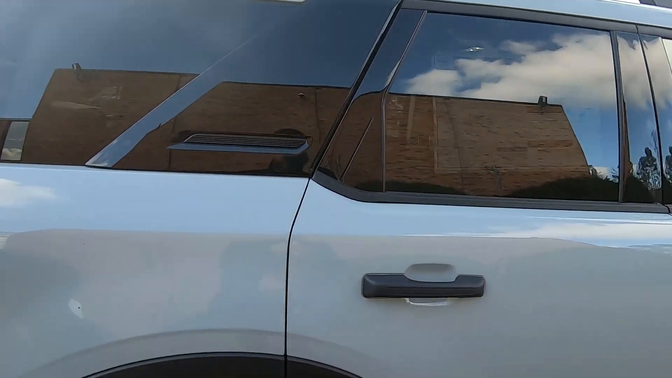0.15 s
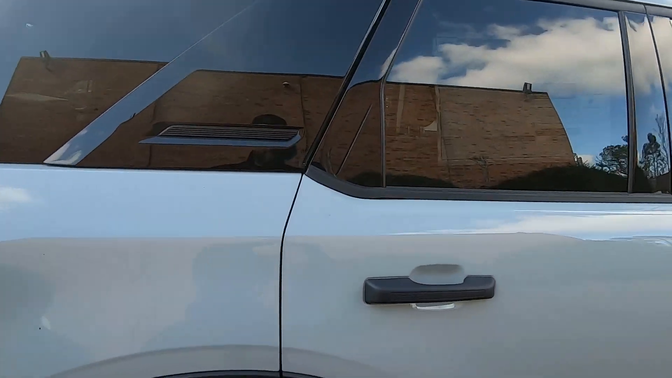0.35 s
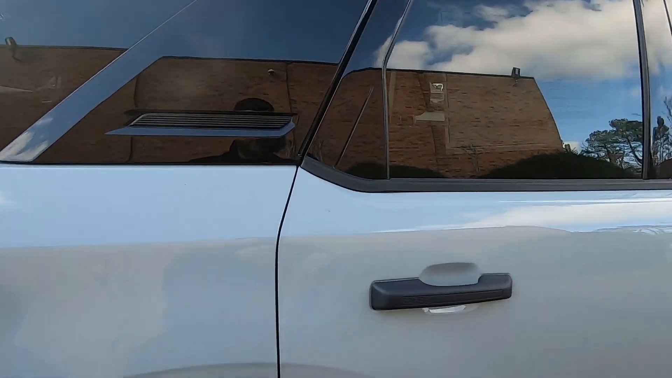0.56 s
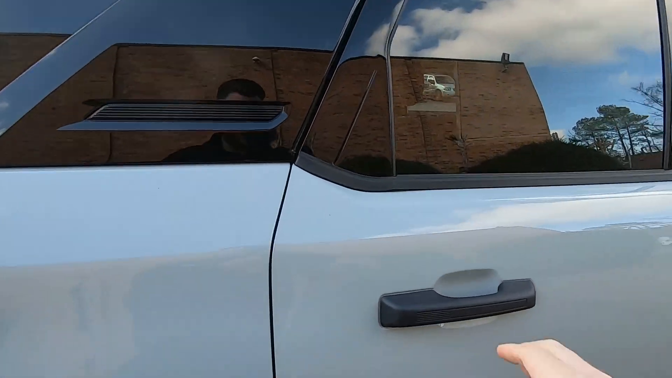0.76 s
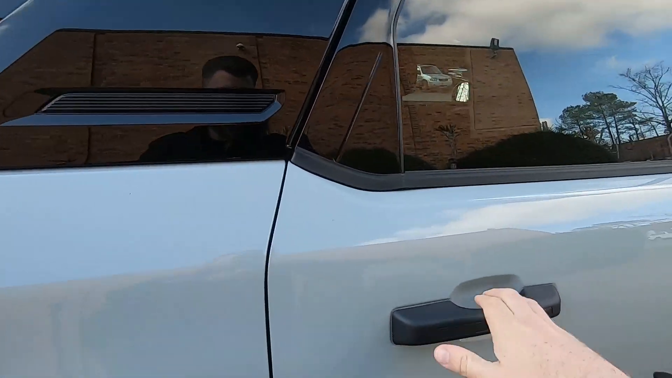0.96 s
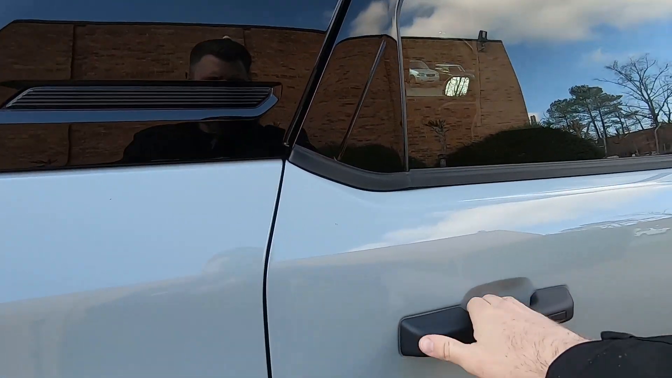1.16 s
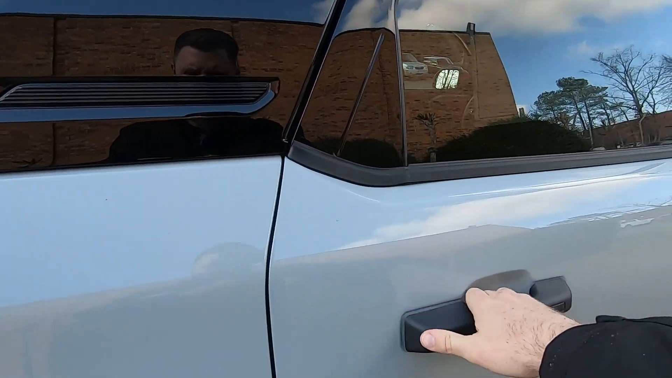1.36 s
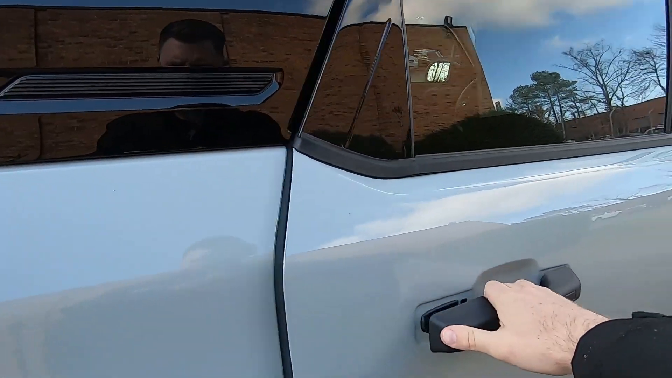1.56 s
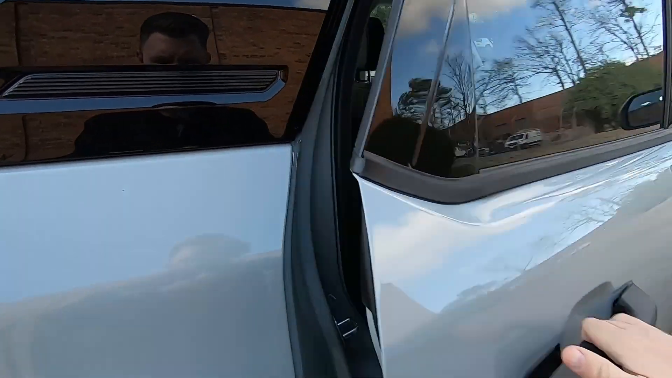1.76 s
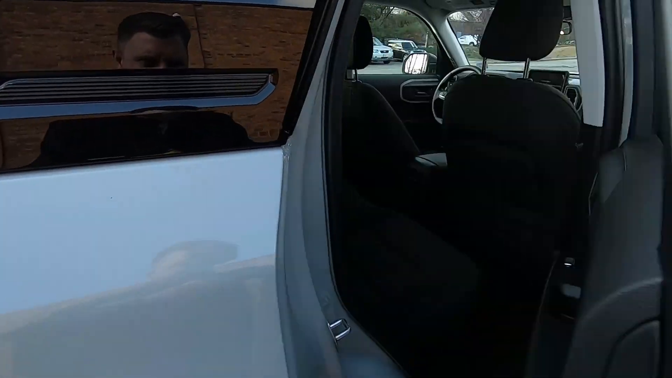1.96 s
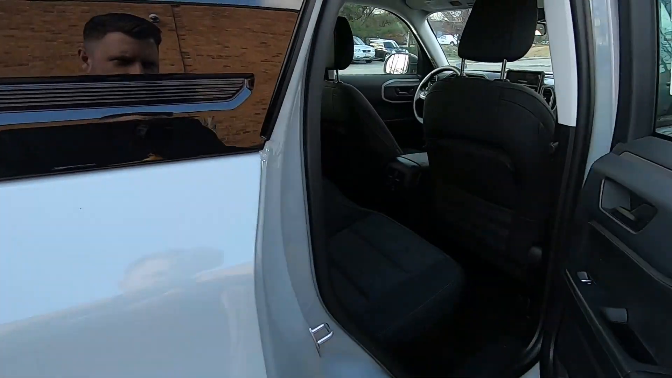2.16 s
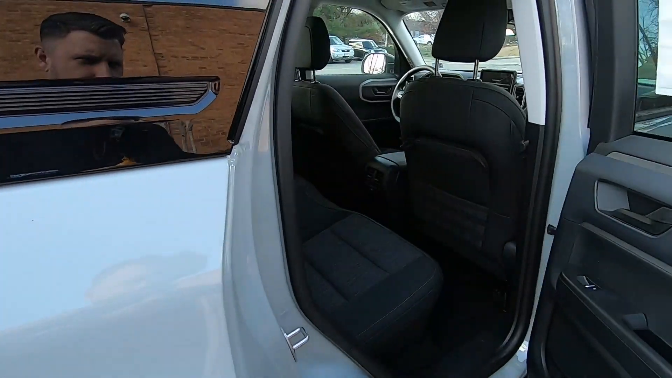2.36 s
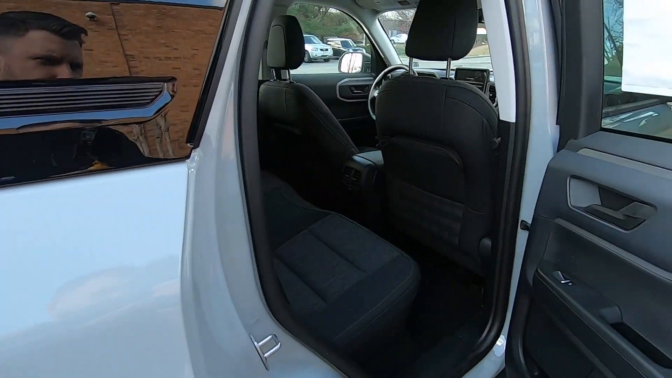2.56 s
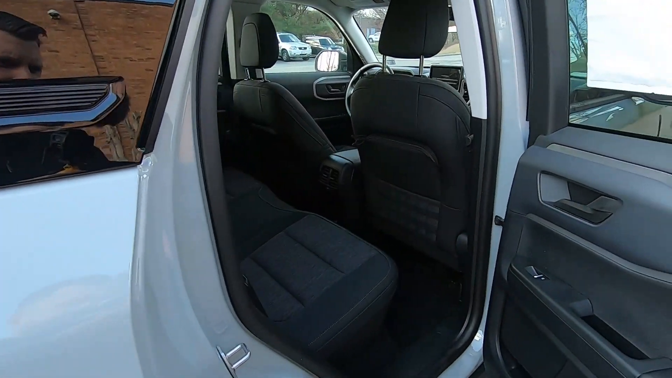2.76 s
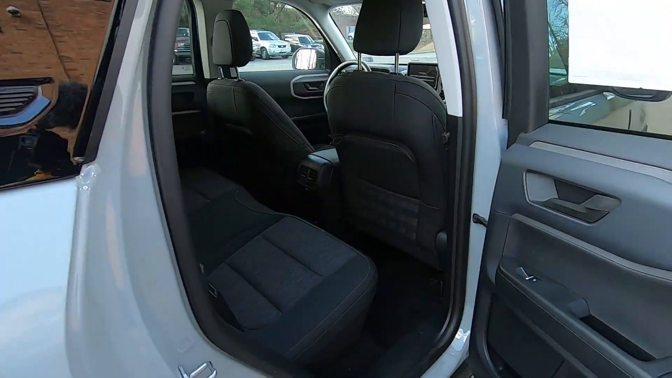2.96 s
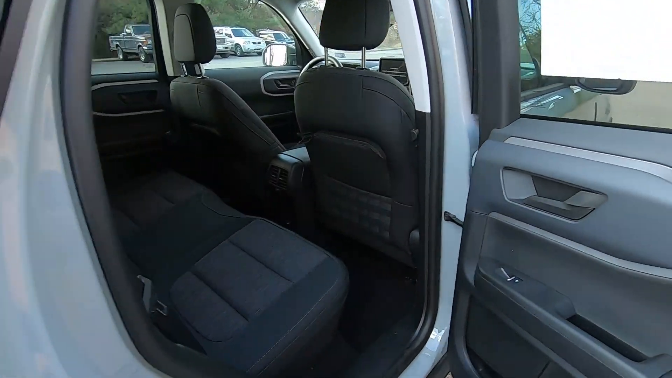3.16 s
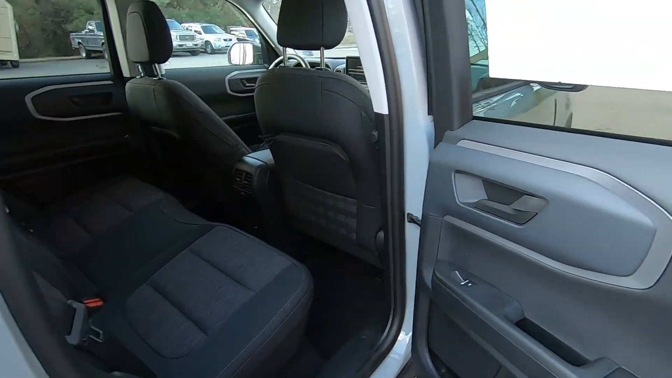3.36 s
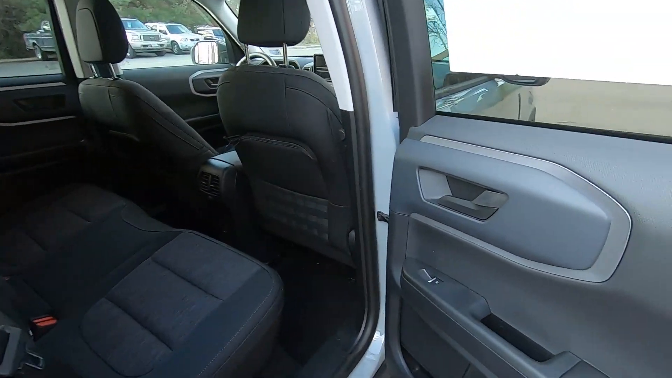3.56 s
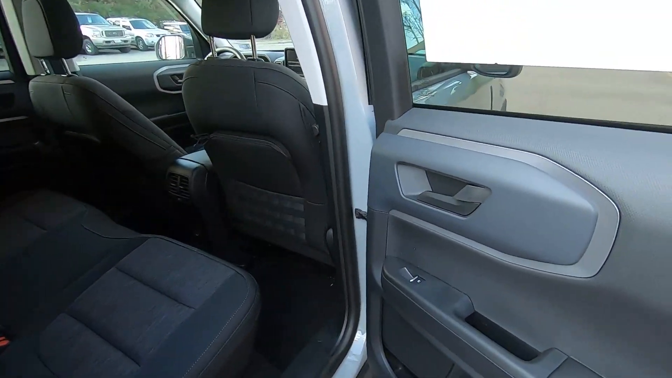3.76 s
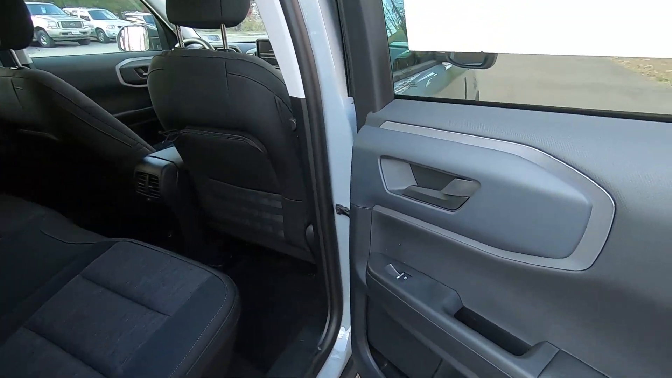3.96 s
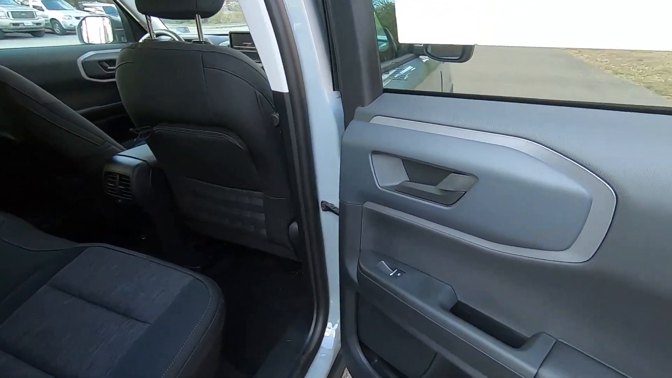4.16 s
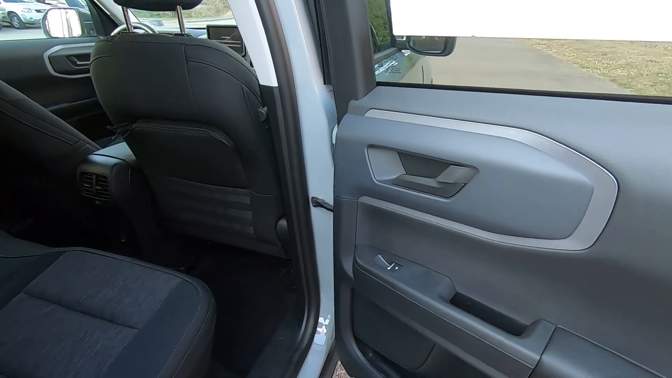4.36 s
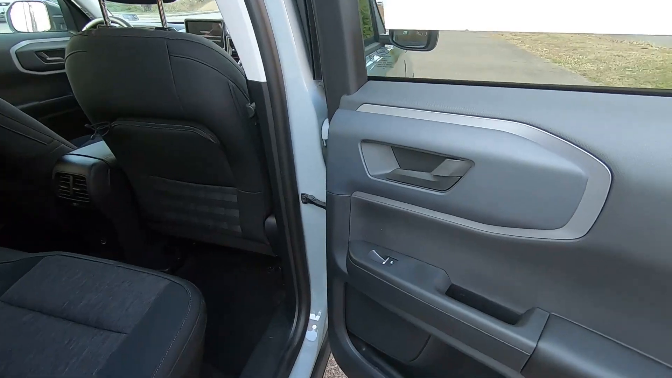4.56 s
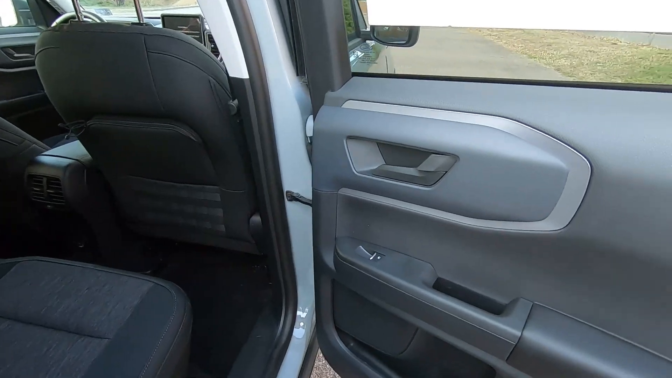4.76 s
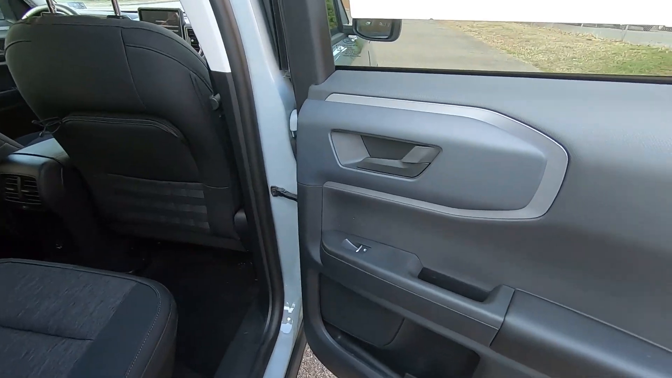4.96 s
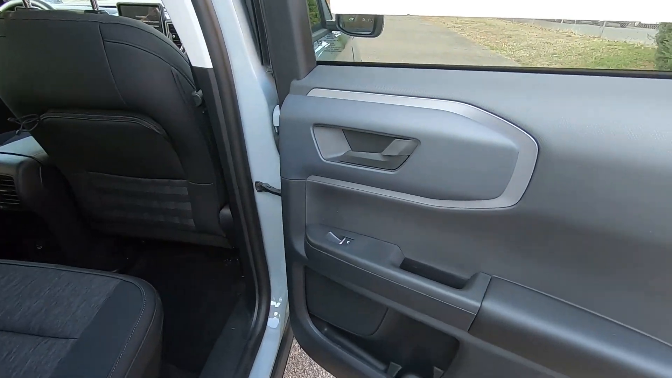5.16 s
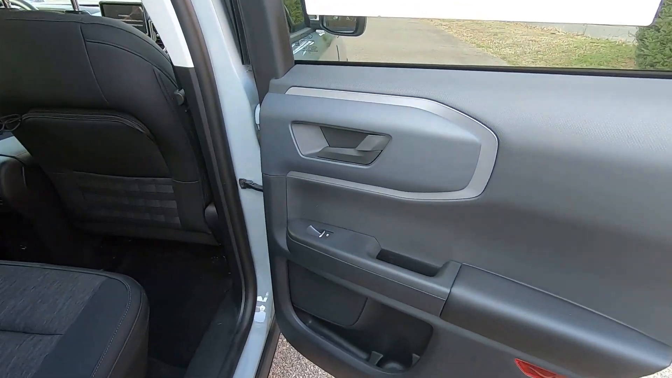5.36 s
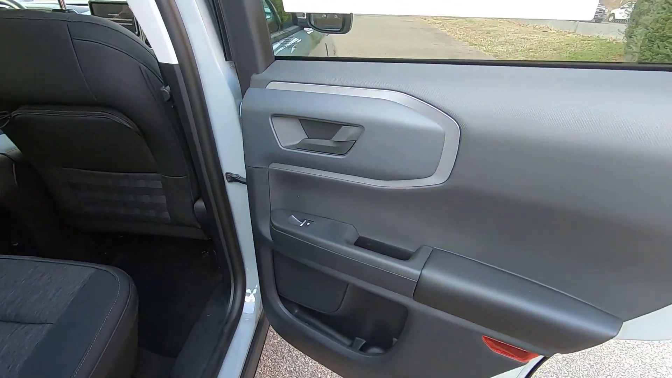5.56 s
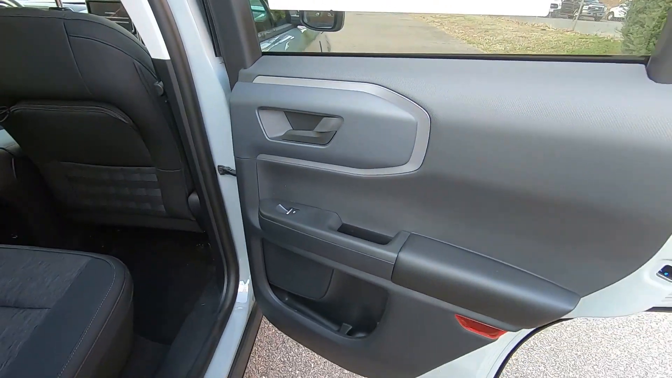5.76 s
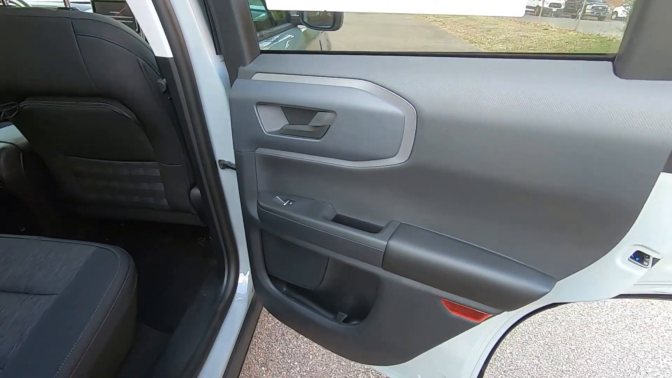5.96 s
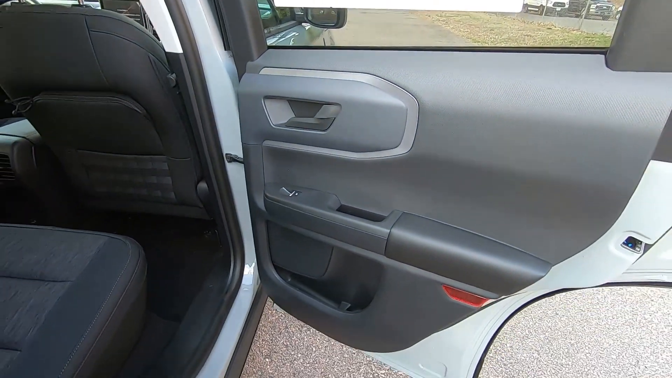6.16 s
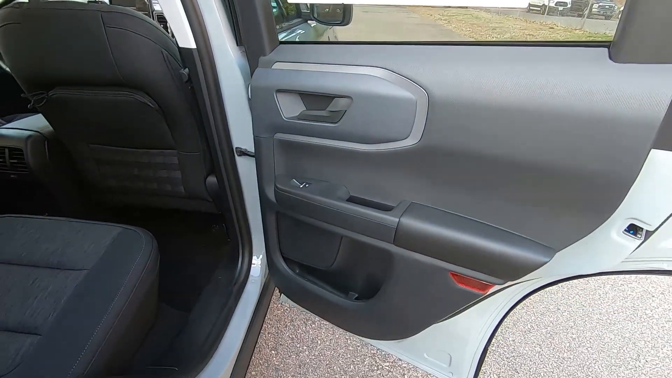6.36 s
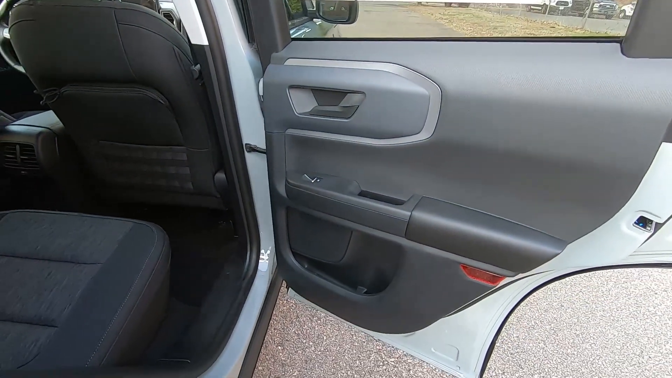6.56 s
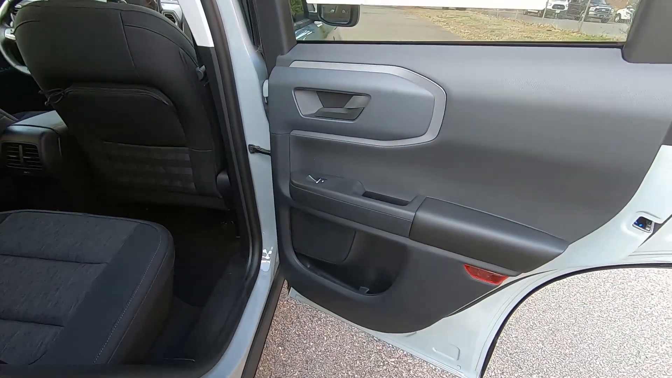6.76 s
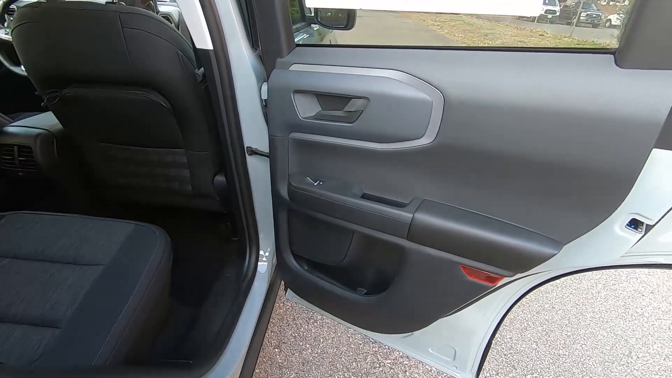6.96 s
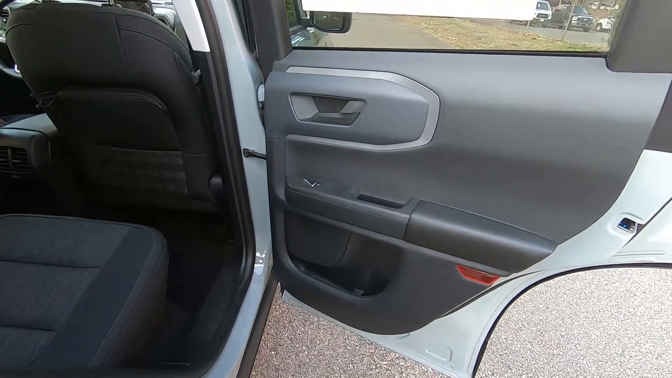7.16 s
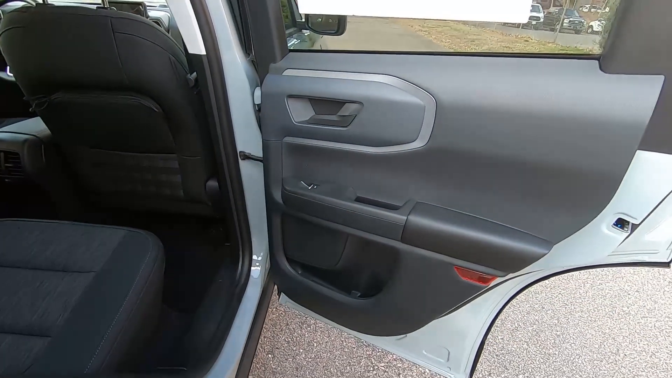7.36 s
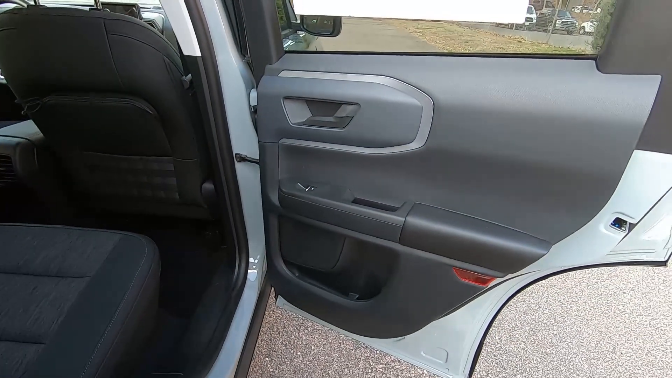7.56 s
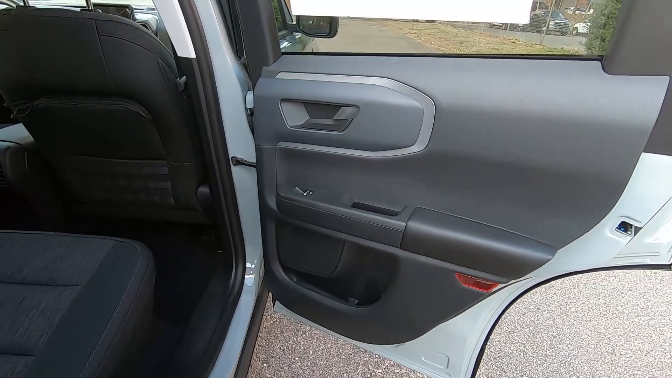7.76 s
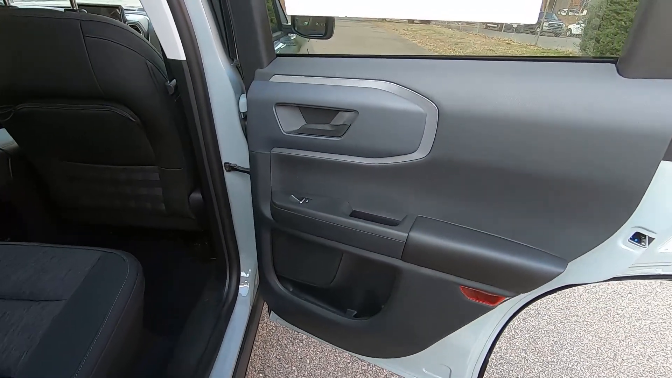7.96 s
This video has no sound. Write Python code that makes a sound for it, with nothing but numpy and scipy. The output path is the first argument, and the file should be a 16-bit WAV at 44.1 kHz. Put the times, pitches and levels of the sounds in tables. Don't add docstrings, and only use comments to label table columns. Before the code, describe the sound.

Outdoors, a car door handle clicks, the latch releases with a deep thunk and rattle, the door jolts open, then faint handling ticks and low wind rumble.

```python
import sys
import numpy as np
from scipy import signal
from scipy.io import wavfile
from scipy.ndimage import uniform_filter1d

SR = 44100
rng = np.random.default_rng(int(sys.argv[2]) if len(sys.argv) > 2 else 0)


def gain_from_db(level_db):
    decades = np.asarray(level_db, float) / 20
    return 10 ** decades


def wrap_up_sound(samples):
    columns = np.atleast_2d(samples).T
    tamed = np.clip(columns, -1, 1)
    steps = np.round(tamed * 32767).astype(np.int16)
    wavfile.write(sys.argv[1], SR, steps)


N = 353373


def rms_one(x):
    return x / np.sqrt(np.mean(x ** 2) + 1e-20)


def peak_one(x):
    return x / np.abs(x).max(axis=1, keepdims=True)


def in_time(rows):
    s, *columns = np.transpose(rows)
    return [np.interp(np.arange(N) / SR, s, c) for c in columns]


def drift(rate):
    r = np.exp(-80 * np.pi * rate / SR)
    white = rng.standard_normal(N // 40 + 2002)
    slow = signal.lfilter([1], [1, -2 * r, r * r], white)[2000:]
    return np.interp(np.arange(N) / 40, np.arange(len(slow)), rms_one(slow))


def band(x, low_hz, high_hz):
    return signal.sosfilt(signal.butter(2, [low_hz, high_hz], "band", fs=SR, output="sos"), x)


def resonate(x, hz, width_hz):
    r = np.exp(-np.pi * width_hz / SR)
    poles = [1, -2 * r * np.cos(2 * np.pi * hz / SR), r * r]
    return signal.lfilter([(1 - r * r) / 2, 0, (r * r - 1) / 2], poles, x)


def coloured(white, spectrum, patchy_db):
    hz, db = np.transpose(spectrum)
    edges = np.append(30 * 2 ** np.arange(0, 9.1, .5), 19000)
    out = 0
    for k, (low, high) in enumerate(zip(edges, edges[1:])):
        level_db = np.interp(np.log(low * high) / 2, np.log(hz), db)
        out = out + gain_from_db(level_db + patchy_db * drift(2.5)) * band(white[k % 2], low, high)
    return rms_one(out)


def bouts(rows, rise, fall):
    t, out = np.arange(N) / SR, 0
    for s, hold, *db in rows:
        shape_db = np.minimum(np.minimum(rise * (t - s), fall * (s + hold - t)), 0)
        out = np.maximum(out, gain_from_db(np.array(db)[:, None] + np.maximum(shape_db, -150)))
    return out


def slip_bursts(t60s, length):
    age = np.arange(length) / SR
    draws = rng.standard_normal((len(t60s), 2, length))
    decay = gain_from_db(-60 * age / np.clip(t60s, .004, .3)[:, None]) * (1 - np.exp(-age / .0002))
    draws[:, :, 8] = 2.2
    return draws[:, 0] * gain_from_db(5 * draws[:, 1]) * decay


def lay(times, shapes):
    out = np.zeros(N + shapes.shape[1])
    for s, shape in zip(times, shapes):
        out[round(s * SR):][:len(shape)] += shape
    return out[:N]


def ticks(rows, t60, width=0.19, above=0.26):
    # frequency in Hz, width in Hz.
    upper_modes = [
        [(3000, 1200), (4000, 1500), (5200, 1700), (6500, 1900)],
        [(8200, 2000), (10500, 2500), (13500, 3500)],
    ]
    bright_fade = 250
    s, note_db, hz, mid_db, top_db = np.transpose(rows)
    slips = slip_bursts(np.full(len(s), t60), length=2500)
    note = []
    for x, f in zip(slips, hz):
        pair = resonate(x, f, width * f) + above * resonate(x, 1.4 * f, 400)
        note.append(resonate(pair, 1.1 * f, 1100))
    shapes = gain_from_db(note_db)[:, None] * peak_one(np.array(note))
    slips = slips * gain_from_db(-bright_fade * np.arange(slips.shape[1]) / SR)
    for group, db in zip(upper_modes, (mid_db, top_db)):
        weaker_db = 1.5 * np.arange(len(group))
        strengths = gain_from_db(2.5 * rng.standard_normal((len(s), len(group))) - weaker_db)
        rung = 0
        for k, (f, w) in enumerate(group):
            rung = rung + (-1) ** k * strengths[:, [k]] * resonate(resonate(slips, f, w), f, 2 * w)
        shapes += gain_from_db(db)[:, None] * peak_one(rung)
    return lay(s, shapes)


def knocks(rows):
    s, db, hz, t60 = np.transpose(rows)
    bursts = slip_bursts(t60, length=8000)
    thuds = [resonate(resonate(x, f, .5 * f), f, 0.6 * f) for x, f in zip(bursts, hz)]
    return lay(s, gain_from_db(db)[:, None] * peak_one(np.array(thuds)))


def panel(blows, modes):
    force = np.full(N, 1e-18)
    age = np.arange(1000) / SR
    for k, (s, db, cut_hz) in enumerate(blows):
        push = age * np.exp(-2 * np.pi * cut_hz * age)
        force[round(s * SR):][:1000] += (-1) ** k * gain_from_db(db) * push / push.sum()
    out = 0
    for hz, db, t60 in modes:
        r, w = gain_from_db(-60 / (t60 * SR)), 2 * np.pi * hz / SR
        out = out + signal.lfilter([0, gain_from_db(db) * np.sin(w)], [1, -2 * r * np.cos(w), r * r], force)
    return out


def wind_pressure():
    # time in seconds, level in dB.
    air_level = [(0, -21.5), (.5, -20.5), (.76, -18), (1.16, -15), (1.47, -36.5), (1.67, -19.5),
                 (1.96, -26), (2.07, -12.5), (2.32, -15.5), (2.5, -24), (3.34, -26.5), (3.88, -15),
                 (4.17, -27), (6.2, -26), (6.45, -23.5), (7.07, -31), (8.01, -31.5)]
    white = rng.standard_normal(N + SR)
    pressure = rms_one(band(band(white, 2.5, 11), 1.5, 14)[SR:])
    pressure /= np.sqrt(uniform_filter1d(pressure ** 2, size=SR // 4) + 3.2)
    return gain_from_db(in_time(air_level)[0]) * pressure


def grip():
    # start in seconds, hold in seconds, buffet level in dB, rub level in dB.
    hand_moves = [(0, 0.15, -36.5, -45.5), (.25, 0.38, -60, -66.5), (.72, 0.02, -57, -52),
                  (.78, 0.03, -43, -54), (.95, 0.49, -46.5, -63), (1.42, 0.1, -62, -58),
                  (1.6, 0.096, -53, -48), (1.82, 0.12, -72, -60), (2.15, 0.13, -68, -61.5),
                  (2.65, .25, -79, -90), (3.144, 0.03, -50, -56.5), (3.32, 0.62, -48.5, -66.5),
                  (3.496, 0.049, -47, -57), (4.3, 0.13, -52.5, -92), (7.2, .9, -63, -73)]
    still_hand_db = np.array([[-60], [-73]])
    buffeting, rubbing = bouts(hand_moves, rise=260, fall=234) + gain_from_db(still_hand_db)
    white = rng.standard_normal((2, N + SR))
    buffet = rms_one(band(band(white[0], 26, 68.0), 40.7, 67.0)[SR:])
    buffet /= np.sqrt(uniform_filter1d(buffet ** 2, size=SR // 10) + 0.44)
    hollow = resonate(white[1], 204.7, 90) + 0.31 * white[1]
    rub = rms_one(band(hollow, 106, 284)[SR:]) * gain_from_db(2.8 * drift(18))
    return buffeting * buffet + rubbing * rub


def sleeve_rustle():
    # start in seconds, hold in seconds, level in dB.
    brushes = [
        (0, 0.13, -82),
        (1.2, 0.023, -68.5),
        (2.62, 0.19, -71),
        (3.4, 0.3, -77),
        (5.44, 0.26, -73.5),
    ]
    fibres = rms_one(band(rng.standard_normal(N) * gain_from_db(4 * drift(300)), 2600, 7000))
    return fibres * bouts(brushes, rise=930, fall=180)[0]


def surroundings():
    # time in seconds, frequency in Hz, level in dB.
    engine = [(0, 85.2, -65), (5, 86.6, -73.5), (6.5, 85.1, -62.5), (8.01, 86.7, -59)]
    # time in seconds, level in dB.
    sheen = [(0, -73.5), (1.3, -72.5), (2.0, -79.5), (3.0, -84), (4.0, -84), (8.01, -88.5)]
    # frequency in Hz, level in dB per Hz.
    far_spectrum = [(18, -30), (30, -4.5), (41, -9.5), (59, -16.5), (98, -17), (134, -23), (238, -33),
                    (309, -33.5), (800, -31.5), (2950, -49), (13200, -56), (15800, -56)]
    around_db, mirror_share = -54, 0.18
    hz, idle_db = in_time(engine)
    sheen_db, = in_time(sheen)
    phase = 2 * np.pi * np.cumsum(hz + 1.6 * drift(3.04)) / SR
    hum = np.sin(phase) * gain_from_db(idle_db + 5.5 + drift(4.8))
    mirrored = gain_from_db(sheen_db) * rms_one(band(rng.standard_normal(N), 1890, 3170))
    level_db = around_db + mirror_share * (sheen_db - sheen_db.mean())
    far = coloured(rng.standard_normal((2, N)), far_spectrum, patchy_db=1.1)
    return gain_from_db(level_db) * far + hum + mirrored


def fine_slips():
    # time in seconds, housing level in dB, housing note in Hz, mid level in dB, top level in dB.
    small_slips = [(.008, -64, 1900, -55, -66), (.0418, -60, 1450, -51, -58), (.054, -64, 2000, -62, -59),
                   (.0623, -60, 2000, -52, -56), (.081, -62, 2000, -51, -62), (.0877, -67, 2400, -51, -59),
                   (.094, -60, 2400, -57, -63), (.1106, -59, 2200, -50.5, -60), (.123, -64, 2400, -54, -63),
                   (.133, -62, 2400, -53, -66), (.1526, -59, 2200, -52, -60), (.167, -60, 2400, -55, -63),
                   (.178, -58, 2000, -55, -63), (1.6325, -32.5, 2400, -58, -58),
                   (5.0235, -45, 1600, -54, -62), (5.0298, -43, 1500, -59, -58),
                   (5.034, -43, 1620, -50, -56), (5.0375, -40, 1610, -46, -58),
                   (5.0405, -43, 1600, -50, -60), (5.0443, -37.5, 1610, -54, -55),
                   (5.049, -43, 1960, -52, -60), (5.053, -47, 1920, -51, -60),
                   (5.0615, -50, 1540, -60, -62), (5.0637, -39, 1570, -54, -62),
                   (5.0702, -36, 1580, -46, -58), (5.075, -45, 1410, -54, -59),
                   (5.082, -50, 1750, -60, -68), (5.6236, -54, 1810, -57, -70), (5.64, -64, 1800, -61, -70),
                   (5.892, -62, 1800, -54, -62), (6.063, -60, 2600, -62, -72),
                   (7.6205, -55, 2280, -57, -64), (7.629, -50, 1880, -57, -68)]
    return ticks(small_slips, t60=0.02, width=0.13, above=0.081)


def snaps():
    # time in seconds, housing level in dB, housing note in Hz, mid level in dB, top level in dB.
    hard_snaps = [
        (.5507, -45.5, 1310, -49, -52),
        (.5996, -42.5, 1350, -47.5, -48),
        (.6905, -49, 1670, -40, -50),
        (1.4152, -36, 1800, -62, -64),
        (1.4528, -36, 1800, -29, -41),
        (1.618, -42, 1200, -55, -50),
        (1.6312, -32, 1780, -63, -39),
        (5.0442, -49, 1500, -52, -44),
        (6.6352, -34, 1500, -50, -46),
        (6.0595, -54, 1340, -65, -72),
    ]
    return ticks(hard_snaps, t60=0.016)


def dull_knocks():
    # time in seconds, peak in dB, frequency in Hz, t60 in seconds.
    thud_list = [(.556, -45, 500, 0.058), (.688, -44, 190, 0.08), (1.415, -53, 587, 0.031),
                 (1.461, -42, 440, 0.099), (1.02, -57, 300, 0.1), (1.208, -43, 150, 0.082),
                 (1.632, -27, 2200, 0.0086), (2.648, -50.5, 277, 0.17), (2.659, -46, 135, 0.054),
                 (3.16, -44, 308, 0.08), (3.149, -39.5, 141, 0.19), (3.497, -38.5, 109, 0.056),
                 (5.032, -49, 990, 0.066), (5.033, -47, 530, 0.12), (2.198, -39, 400, 0.071),
                 (6.246, -51, 420, 0.02), (6.634, -44, 928, 0.015), (6.634, -43, 480, 0.012),
                 (6.635, -42, 2020, 0.063), (7.943, -45.5, 860, 0.027)]
    return knocks(thud_list)


def step_ticks():
    # time in seconds, housing level in dB, housing note in Hz, mid level in dB, top level in dB.
    step_slips = [(.6935, -47.5, 1670, -55, -58), (.5644, -41.5, 1230, -59, -50),
                  (.746, -58, 1500, -58, -61), (.6237, -51, 2300, -64, -65), (3.128, -50, 2140, -54, -55),
                  (1.2585, -50, 2480, -61, -69), (2.642, -47.5, 1510, -49, -63),
                  (2.7103, -60, 2710, -60, -72), (2.82, -36.5, 1690, -60, -72),
                  (2.9532, -71, 1760, -52, -70), (3.0654, -55, 1680, -61, -59),
                  (3.0799, -64, 1970, -46.5, -53), (3.0965, -44, 1770, -56, -52),
                  (3.1084, -53, 1660, -60, -56), (3.1335, -42, 2600, -49, -59),
                  (3.429, -56, 1500, -53.5, -78), (3.477, -55, 1650, -57, -56.5),
                  (3.505, -51, 1380, -58, -59), (3.5543, -55, 1340, -52.5, -73),
                  (3.6097, -52, 1380, -56, -58), (3.798, -51, 1750, -66, -56),
                  (3.865, -66, 1540, -50.5, -69), (4.1018, -55, 2280, -53, -63),
                  (4.1223, -50.5, 1510, -59, -72)]
    return ticks(step_slips, t60=.036)


def rings():
    # time in seconds, level in dB, frequency in Hz, t60 in seconds.
    free_modes = [(1.416, -39, 540, 0.095), (1.594, -29, 430, .05), (1.649, -35, 360, .2),
                  (1.695, -44.5, 373, 0.23), (1.664, -43, 1090, 0.17), (1.68, -37, 150, 0.068),
                  (2.215, -47, 347, .25), (3.134, -49, 557, 0.054), (3.134, -44, 1030, 0.045),
                  (5.047, -49, 530, .06), (5.055, -58, 910, .05), (5.066, -50, 960, .08),
                  (5.062, -43, 2030, .04), (1.608, -28, 345, .11), (2.2035, -28, 190, .07),
                  (2.176, -36, 720, .05), (1.6318, -36, 900, .03), (1.6322, -34, 2650, .02),
                  (6.6345, -30, 800, .013), (6.6348, -33, 1900, .02), (6.6375, -39, 1500, .03),
                  (6.8225, -47, 8350, .02), (6.824, -50, 960, .03), (6.8222, -52, 1800, .02),
                  (5.587, -63, 5300, .06), (5.586, -56, 2400, .08), (5.591, -55, 1900, .06),
                  (4.334, -55, 4300, .025), (4.3385, -54, 4300, .025), (7.6235, -46, 2100, .025),
                  (6.3465, -50, 1700, .02), (6.246, -53, 1050, .03), (3.149, -36, 260, .025),
                  (.69, -36, 195, .15), (3.1345, -39, 1700, .035)]
    s, db, hz, t60 = np.transpose(free_modes)[:, :, None]
    age = np.arange(12000) / SR
    swell = 1 - np.exp(-age * hz)
    return lay(s[:, 0], gain_from_db(db - 60 * age / t60) * swell * np.sin(2 * np.pi * hz * age))


def glints():
    # time in seconds, peak in dB, frequency in Hz, t60 in seconds.
    click_edges = [(0.6913, -43, 6000, 0.014), (1.4527, -35, 4500, 0.012), (1.457, -45, 1050, .05),
                   (1.47, -47, 750, .05), (1.597, -35, 780, .06), (1.615, -32, 840, .05),
                   (2.19, -37, 297, 0.13), (2.226, -50, 270, .1), (3.146, -49, 3380, 0.05),
                   (3.153, -43, 2600, 0.057), (3.158, -51, 3800, .03), (3.15, -44, 1050, .03),
                   (5.031, -49, 3420, .06), (5.045, -53, 5200, .04), (5.069, -54, 3500, .03),
                   (6.65, -56, 620, .08), (6.636, -51, 1780, 0.033), (6.823, -46, 3000, 0.023)]
    return knocks(click_edges)


def palm_bumps():
    # time in seconds, peak in dB, frequency in Hz, t60 in seconds.
    bumps = [(.725, -43, 203, 0.077), (.775, -50, 210, 0.11), (.822, -46, 150, 0.055), (.86, -49, 209, .07),
             (0.901, -47, 200, .06), (.978, -51, 210, .1), (1.096, -44, 124, 0.089),
             (1.145, -44.5, 130, 0.045), (1.155, -55, 220, 0.055), (1.262, -49, 180, 0.055),
             (1.298, -43, 135, 0.089), (1.341, -52, 200, 0.047), (3.15, -52, 250, 0.028),
             (3.19, -54, 320, .08), (3.211, -47, 320, 0.053)]
    return knocks(bumps)


def road():
    # start in seconds, hold in seconds, level in dB, frequency in Hz, width in Hz.
    passing = [
        (0.73, 0.68, -71, 1470, 160),
        (1.784, 0.14, -65, 1480, 80),
        (1.75, .3, -67, 330, 52),
        (2.22, .3, -67, 265, 140),
        (3.0, 5.0, -75, 1433, 700),
        (5.7, .8, -70, 960, 103),
        (6.05, 0.26, -68.5, 560, 12),
        (6.5, 1.7, -69, 700, 290),
        (7.6, .4, -72.5, 760, 51),
        (4.9, 0.72, -64.5, 127, 61),
    ]
    swell = 108
    white = rng.standard_normal((2, N))
    out = 0
    for k, (s, hold, db, hz, width) in enumerate(passing):
        tyres = rms_one(resonate(resonate(white[k % 2], hz, width), hz, 2 * width))
        out = out + bouts([(s, hold, db)], swell, swell)[0] * tyres
    return out


def door_ticks():
    # time in seconds, housing level in dB, housing note in Hz, mid level in dB, top level in dB.
    linkage_slips = [(1.3793, -46.5, 1930, -53, -63), (1.3911, -59, 1290, -56, -61),
                     (1.4245, -66, 2550, -53, -42), (1.427, -58, 2460, -39.5, -45.5),
                     (1.4445, -40, 1910, -43, -53), (1.4585, -51, 1200, -56, -58),
                     (1.4896, -47, 1670, -56, -66), (1.5945, -57, 1480, -53, -54),
                     (1.61, -39, 1430, -49, -46), (1.6264, -49, 1500, -43, -59),
                     (1.656, -53, 1290, -57, -60), (1.705, -59, 1190, -61, -66),
                     (1.6425, -42, 1210, -48, -48), (1.6681, -61, 2000, -52, -56),
                     (1.678, -44, 2410, -64, -58), (1.6926, -52, 2700, -54, -57),
                     (1.7185, -70, 1340, -66, -55), (2.1395, -48, 1200, -69, -73),
                     (2.1778, -37, 1500, -44, -46), (2.1795, -33, 2050, -42, -64),
                     (2.1912, -38, 2150, -52, -62), (2.2326, -55, 1230, -53, -62)]
    return ticks(linkage_slips, t60=.028)


def rattle():
    # start in seconds, hold in seconds, body level in dB, bright level in dB.
    chatter = [(1.416, 0.008, -47, -64), (1.455, 0.01, -47, -60), (1.595, .006, -35, -47.5),
               (1.612, 0.014, -39.5, -60), (1.632, .006, -40, -57), (1.645, 0.047, -45.5, -71),
               (2.137, 0.035, -55.5, -72), (1.76, 0.27, -64, -75.5), (2.176, 0.0053, -35.5, -59),
               (2.185, 0.012, -40.5, -67), (3.146, 0.0062, -51, -59), (3.18, 0.025, -68, -78)]
    # frequency in Hz, level in dB per Hz.
    grain_colour = [(240, -53), (400, -3), (1200, -13.5), (1590, -20.5), (2590, -26.5), (3010, -25),
                    (7440, -33), (15500, -42)]
    rise = 8000
    sizes = gain_from_db(3 * np.minimum(rng.exponential(1, (2, N)), 4)) * rng.choice([-1, 1], (2, N))
    struck = rng.random((2, N)) < 6000 / SR
    grains = coloured(sizes * struck, grain_colour, patchy_db=2)
    body = bouts(chatter, rise, fall=330)[0]
    bright = bouts(chatter, rise, fall=380)[1]
    return body * rms_one(band(grains, 380, 2200)) - bright * rms_one(band(grains, 2200, 17000))


def frame_knocks():
    # time in seconds, peak in dB, frequency in Hz, t60 in seconds.
    after_knocks = [(1.425, -42, 209, .04), (1.444, -45, 646, .06), (1.446, -48, 1050, .04),
                    (1.458, -45.5, 208, 0.039), (1.466, -42, 420, .05), (1.49, -44, 400, .1),
                    (1.608, -36, 950, 0.039), (1.632, -28, 1050, .03), (1.645, -35, 500, 0.035),
                    (1.648, -42, 1140, .05), (1.66, -38, 350, 0.06), (1.683, -41, 1070, 0.044),
                    (1.7, -43, 366, 0.045), (1.703, -42, 1070, 0.042), (2.2, -54, 205, .04)]
    return knocks(after_knocks)


def creaks():
    # start in seconds, gap in seconds, housing level in dB, housing note in Hz, mid level in dB.
    creak_runs = [
        (1.651, .0072, -53.5, 2400, -58),
        (3.144, .0024, -48, 2000, -57),
        (5.584, .002, -57, 2100, -58),
        (1.4555, .0025, -52, 1900, -54),
    ]
    top_db, scatter_db = -11.5, 2
    rows = []
    for s, gap, note_db, hz, mid_db in creak_runs:
        for k, (late, a, b, c, d) in enumerate(rng.standard_normal((8, 5))):
            rows.append((s + gap * (k + 0.084 * late), note_db + scatter_db * a, hz * (1 + b / 20),
                         mid_db + scatter_db * c, mid_db + top_db + scatter_db * d))
    return ticks(rows, t60=.025)


def latch():
    # time in seconds, level in dB, contact cut in Hz.
    latch_hits = [
        (1.5936, -8.2, 162),
        (1.5952, -8.6, 950),
        (1.6033, -18.5, 2300),
        (1.6088, -27, 2050),
        (1.6317, -23, 810),
        (1.6456, -30, 3900),
    ]
    # frequency in Hz, level in dB, t60 in seconds.
    thunk_modes = [(83, -15.7, .167), (158, .5, .082), (212, -17.3, .147), (290, -12.5, .1),
                   (354, -10.5, .17), (560, -41, .08), (905, -31, .1), (1184, -34, .12)]
    return panel(latch_hits, thunk_modes)


def check_strap():
    # time in seconds, level in dB, contact cut in Hz.
    strap_hits = [
        (2.176, -70, 1500),
        (2.18, -59, 1200),
        (2.181, -26.5, 1200),
        (2.184, -36, 890),
        (2.2032, -48, 500),
    ]
    # frequency in Hz, level in dB, t60 in seconds.
    jolt_modes = [(200, 5, 0.049), (276, -24, 0.068), (326, -7, 0.15), (393, -5.5, 0.11), (694, -8, 0.05),
                  (780, -35, .1), (1050, -21, 0.093), (2070, -27, .05), (3300, -24, .04)]
    return panel(strap_hits, jolt_modes)


def grip_ticks():
    # time in seconds, housing level in dB, housing note in Hz, mid level in dB, top level in dB.
    grip_slips = [(4.1685, -47, 1420, -56, -58), (4.3333, -52, 1540, -54, -57), (4.35, -42, 1480, -60, -62),
                  (4.491, -44.5, 1380, -56, -58), (4.5083, -47, 1450, -57, -67),
                  (4.752, -48, 1250, -43.5, -48), (4.798, -43.5, 1320, -46, -56),
                  (4.9928, -55, 2130, -58, -75), (5.445, -55, 1250, -55.5, -73),
                  (5.551, -55, 1870, -48, -74), (5.606, -58, 1920, -66, -72), (5.696, -53, 1750, -65, -72),
                  (5.8644, -58, 2000, -53, -60), (5.8806, -53, 1434, -50, -51),
                  (5.9811, -52, 1510, -61, -65), (6.2457, -52, 1550, -61, -66),
                  (6.2801, -58, 2450, -59, -61), (6.2895, -47, 1450, -53, -69),
                  (6.3455, -55, 2630, -56, -66), (6.3507, -43, 1840, -52, -60),
                  (6.2996, -61, 2470, -65, -75), (6.8217, -46.5, 1350, -50, -46),
                  (7.611, -62, 2600, -53, -64), (7.9446, -50, 1993, -58, -66)]
    return ticks(grip_slips, t60=.034)


def scene():
    around = wind_pressure() + surroundings() + road()
    hand = grip() + sleeve_rustle() + fine_slips() + snaps() + dull_knocks() + step_ticks()
    hand = hand + glints() + palm_bumps() + creaks() + grip_ticks()
    door = rings() + door_ticks() + rattle() + frame_knocks() + latch() + check_strap()
    return (around + hand + door)[None]


def band_limit(x):
    return signal.sosfilt(signal.butter(12, 16160, fs=SR, output="sos"), x)


def record(dry):
    top_cut = signal.cheby2(12, 70, 16600, fs=SR, output="sos")
    return band_limit(signal.sosfilt(top_cut, dry))


dry = scene()
out = record(dry)
wrap_up_sound(out)
```